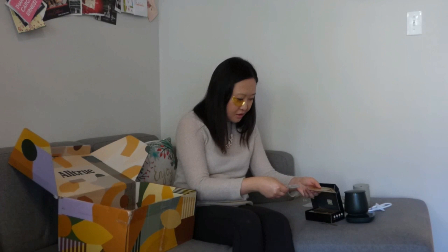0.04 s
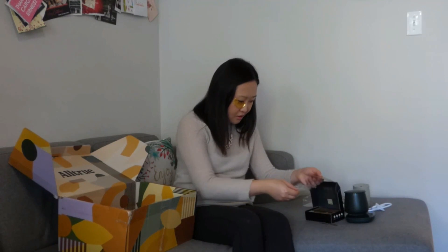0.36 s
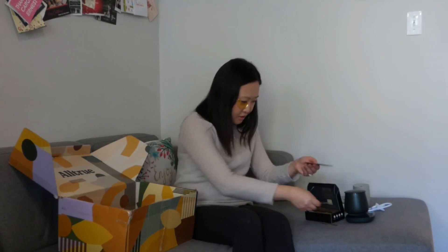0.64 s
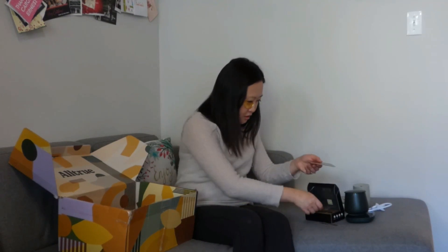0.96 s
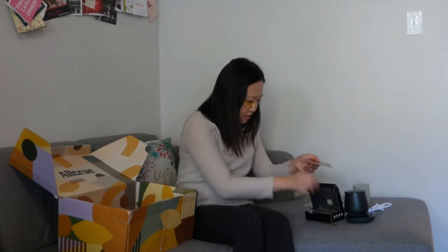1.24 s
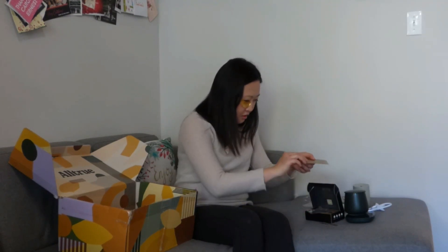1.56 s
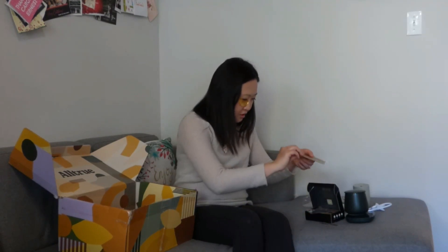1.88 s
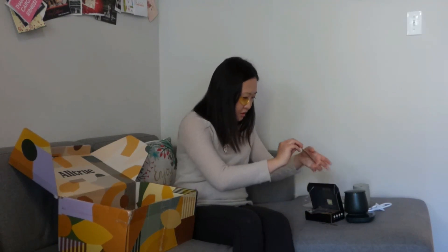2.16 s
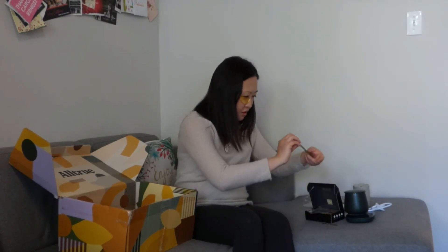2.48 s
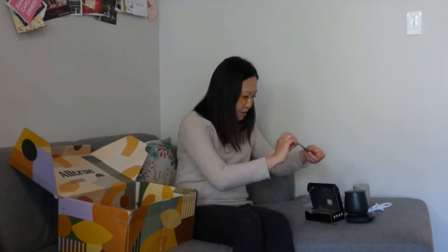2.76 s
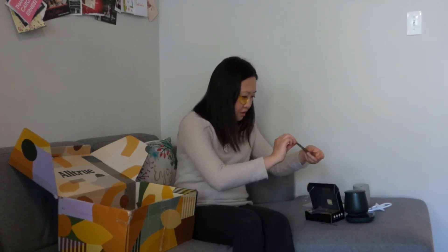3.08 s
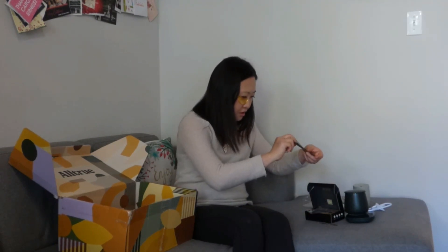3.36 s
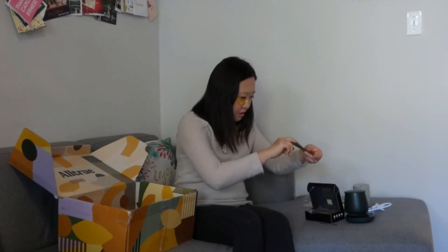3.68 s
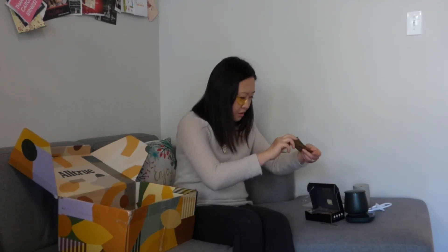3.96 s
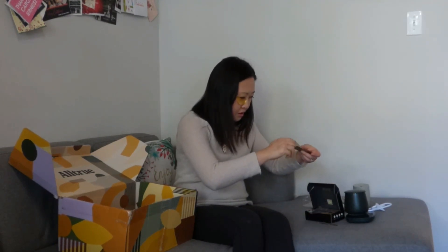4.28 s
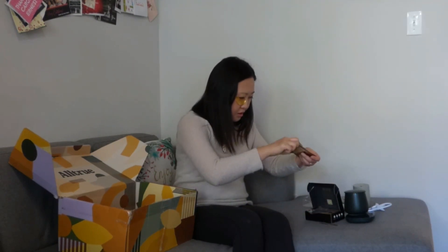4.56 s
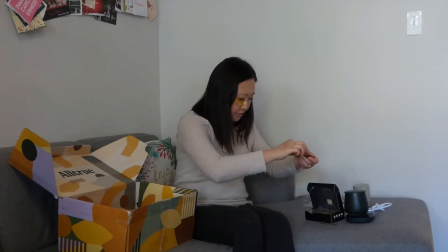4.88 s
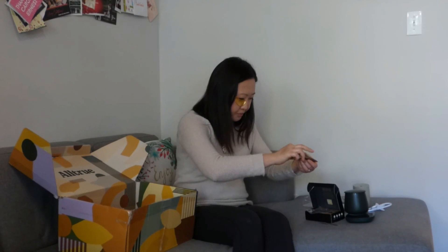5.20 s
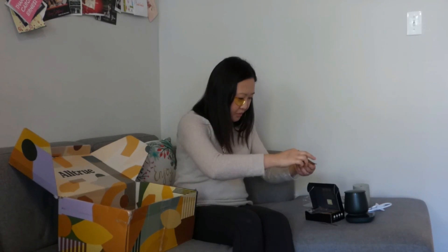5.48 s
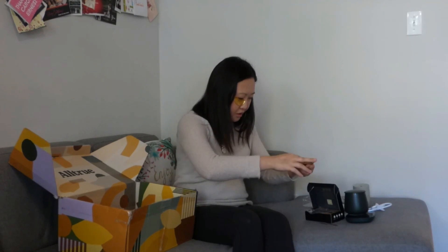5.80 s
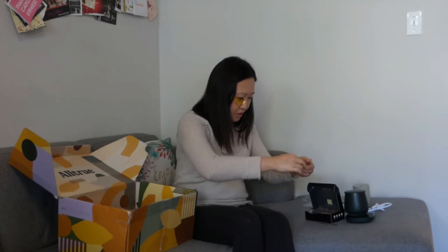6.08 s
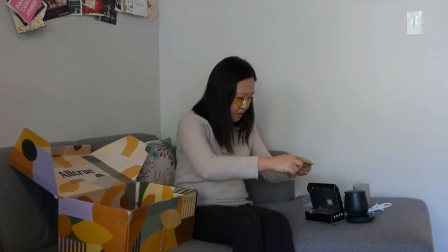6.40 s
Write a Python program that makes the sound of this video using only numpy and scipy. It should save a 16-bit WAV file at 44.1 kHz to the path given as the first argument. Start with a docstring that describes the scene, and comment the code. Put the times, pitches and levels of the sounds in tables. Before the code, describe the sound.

A faint, steady rumble and hiss of room air runs throughout. In the first second there are a few soft plastic ticks and brief rubs of card, with a tiny tap at about 0.5 seconds and a clearer light knock of an item against its box at 1.2. After a near-quiet moment, a stiff plastic wrapper starts crackling at about 2.3 seconds as fingers work at it. Another short cluster of crisp snaps comes around 3.4 to 3.8. From 4.3 the crinkling is busier, mixed with thin rustling, short card scrapes and a few very soft thumps as the hollow pack flexes. It grows louder around 5.7, and the sharpest crackles fall between 6.3 and 6.5 seconds. Everything is fairly quiet, straight ahead and about two metres away, with the short echo of a small bare-walled room.

```python
"""A stiff plastic wrapper crackles as someone unboxes a small item and works it open, two metres or so away.
Each crackle is a run of tiny buckling snaps in the film; between them fingers rub the wrapper and its card.
The item knocks against its box, and the hollow pack thumps softly as it flexes.
A small bare-walled room answers, over a faint steady bed of air rumble and hiss."""
import sys
import numpy as np
from scipy import signal
from scipy.fft import rfft, irfft, next_fast_len
from scipy.io import wavfile

SR = 44100
rng = np.random.default_rng(int(sys.argv[2]) if len(sys.argv) > 2 else 0)


def master_out(mix):
    """Clip the mix to full scale and print it as 16-bit PCM to the path in sys.argv[1]."""
    frames = np.transpose(np.atleast_2d(mix))
    ceiling = np.clip(frames, -1, 1)
    pcm = np.round(ceiling * 32767).astype(np.int16)
    wavfile.write(sys.argv[1], SR, pcm)


N = 288414

# How hard the fingers work the pack, and how much goes into the film: time_s, effort_db, film_offset_db
EFFORT = [(0, -69, -8.5), (2.25, -69, -2), (2.4, -56, -2), (2.75, -60.5, -1.5), (3.0, -70, -13),
          (3.46, -53, 3.5), (3.7, -64, 4), (4.15, -56, -11), (4.33, -45, -5), (4.68, -51.5, 2),
          (5.08, -69.5, -3), (5.26, -45.5, -3), (5.56, -53.5, 2.5), (5.75, -35.5, 2.5), (5.89, -50, -3),
          (6.18, -44.5, -9), (6.44, -38, -0.5), (6.54, -53, 2)]


def crackles(count=60, lead=.45, uneven_db=5.5, swell_db=9, break_db=11, overrun_s=.0015):
    """A fold gives way in an avalanche of fine snaps that grows until the crease itself flips."""
    body_trim_db, snap_db, sizzle_db, sizzle_per_body = -1.5, -.5, -3, -.18  # more body, less sizzle
    trigger_db, trigger_db_per_s = 22, -1700  # the slower the build-up, the weaker the snap that starts it
    size = 4096
    colours = registers(np.fft.rfftfreq(size, 1 / SR))
    out = np.zeros(N + 2 * size)
    for time_s, build_s, level_db, body_db in buckles():
        span_s = np.clip(build_s, .001, .025) + overrun_s
        progress = (np.arange(count) + rng.random(count)) / count * (1 + lead) - lead
        growth = progress + 3 * np.minimum(progress, 0)  # faint ticks run ahead of the build-up
        sizes = amp(swell_db * growth + uneven_db * np.clip(rng.standard_normal(count), -2, 2))
        sizes[count - count // 8] = amp(swell_db + break_db)  # the crease flips
        sizes[np.searchsorted(progress, 0)] = amp(trigger_db + trigger_db_per_s * build_s)
        avalanche = snaps((progress + lead) * span_s, sizes, size)
        bands = irfft(rfft(avalanche) * colours)
        bands *= np.sqrt(span_s * SR) / np.linalg.norm(bands, axis=1, keepdims=True)
        mix_db = np.array([body_trim_db + body_db, snap_db, sizzle_db + sizzle_per_body * body_db])
        start = round((time_s - build_s - lead * span_s) * SR)
        out[start:][:size] += amp(level_db + mix_db) @ bands
    return out[:N]


def buckles(rebound_s=.018, rebound_db=-12, strays_per_s=9, stray_db=1.5, spread_db=1.5):
    """Cue list: each clear buckle springs back once, softly; small strays follow the pull on the film."""
    # Clear buckles, large facets having more body: time_s, build_s, level_db, body_offset_db
    clear = [(0.471, 0.0071, -51.5, 2.5), (.957, 0.0028, -54.5, -20), (1.007, .01, -58, -1),
             (1.077, 0.0073, -54.5, -4), (1.213, .008, -43, -3.5), (1.585, 0.015, -69, -12),
             (1.741, 0.0065, -56, -4), (1.991, .019, -64, -4.5), (2.084, 0.018, -64, -22),
             (2.122, 0.014, -64, -1.5), (2.349, 0.011, -41, -11.5), (2.385, 0.013, -39, -12.5),
             (2.469, 0.011, -49.5, -6.5), (2.525, 0.0082, -48.5, -28), (2.666, 0.0087, -45.5, -3.5),
             (2.722, 0.016, -52, -7), (2.847, 0.0062, -52.5, -20), (3.122, 0.0072, -49.5, -12),
             (3.25, 0.021, -59.5, 3.5), (3.328, 0.0085, -51.5, -3), (3.399, 0.0071, -36.5, -9.5),
             (3.423, 0.011, -41.5, -7.5), (3.497, .018, -44, -4), (3.621, 0.0085, -47, -3.5),
             (3.725, 0.017, -59, -24), (3.767, 0.0068, -41, -8.5), (3.982, .015, -60, 4.5),
             (4.09, 0.0032, -56, 5.5), (4.251, 0.019, -57.5, -2), (4.308, 0.0069, -43, -3),
             (4.332, 0.0025, -37, -26), (4.339, 0.0056, -37, -23), (4.457, 0.0054, -40.5, -9),
             (4.557, 0.0062, -34.5, -4), (4.633, 0.026, -39.5, -2), (4.779, 0.005, -44.5, -15),
             (4.797, 0.0083, -48, -57), (4.908, 0.0053, -48, -3), (4.979, 0.0057, -49, -8),
             (5.091, 0.0012, -43.5, -7), (5.099, 0.0069, -38.5, -5.5), (5.217, .011, -37.5, -9.5),
             (5.239, 0.0082, -44, -5.5), (5.303, 0.0098, -44, -3), (5.37, 0.0074, -42, -5.5),
             (5.443, 0.0012, -33, -16), (5.449, 0.0033, -34.5, -7), (5.6, 0.015, -44.5, -3.5),
             (5.62, .015, -44, -10.5), (5.679, .012, -33.5, -7.5), (5.695, 0.0081, -30, -12),
             (5.712, 0.011, -36, -4.5), (5.793, 0.0066, -29, -12), (5.807, .008, -39.5, 1),
             (5.852, 0.011, -32, -4.5), (5.98, 0.018, -50, 7), (6.046, 0.0088, -43, -20),
             (6.12, 0.018, -50.5, 6.5), (6.193, 0.0083, -40.5, -2.5), (6.263, 0.015, -34, -4.5),
             (6.302, 0.0016, -22.5, -7), (6.308, 0.0037, -28, -2.5), (6.422, 0.0041, -32, -6),
             (6.473, 0.0087, -29, -12.5)]
    rebound_build_s, stray_build_s, stray_body_db = .006, .005, -14
    delays = rebound_s * np.exp(.3 * rng.standard_normal(len(clear)))
    rebounds = [(time_s + delay, rebound_build_s, db + rebound_db, body_db)
                for (time_s, _, db, body_db), delay in zip(clear, delays)]
    slots = np.arange(.1, N / SR - .1, 1 / strays_per_s)
    jitter, accent = rng.standard_normal((len(slots), 2)).T
    times = np.clip(slots + jitter / strays_per_s / 2, .1, (N - 1) / SR)
    effort_db, film_offset_db = curves(EFFORT)
    pull_db = sliding(effort_db) + film_offset_db
    levels = pull_db[(times * SR).astype(int)] + stray_db + spread_db * accent
    strays = [(time_s, stray_build_s, db, stray_body_db) for time_s, db in zip(times, levels)]
    return clear + rebounds + strays


def snaps(times, sizes, length, pitch_hz=4500, decay_cycles=.43):
    """Each facet that flips gives a damped swing of about one cycle at a pitch of its own."""
    t = np.arange(SR // 400) / SR
    detune, polarity = rng.standard_normal((len(times), 2)).T
    hz = np.clip(pitch_hz * np.exp(detune[:, None]), SR / 60, SR / 3)
    swing = np.cos(2 * np.pi * hz * t) * np.exp(-t * hz / decay_cycles)
    swing *= (np.sign(polarity) * sizes / np.linalg.norm(swing, axis=1))[:, None]
    at = (np.maximum(times, 0) * SR).astype(int)[:, None] + np.arange(len(t))
    return np.bincount(at.ravel(), swing.ravel(), length)[:length]


def registers(hz, body_hz=2500, sizzle_hz=7500):
    """Responses of the wrapper's body, snap and sizzle: large, middling and tiny facets."""
    # Tone colour of one snap in the film: frequency_hz, gain_db
    film_colour = [(60, -21), (150, -39), (290, -1), (390, -15.5), (500, 0.5), (700, -4.5), (1200, -1.5),
                   (2100, -2.5), (3000, -4), (4800, 2.5), (7500, 5), (10000, 4), (13000, -1.5),
                   (15500, -13)]
    body = 1 / (1 + (hz / body_hz) ** 10)
    sizzle = 1 - 1 / (1 + (hz / sizzle_hz) ** 10)
    gain = amp(along(film_colour, hz))
    return np.array([causal(gain * np.sqrt(np.abs(share))) for share in (body, 1 - body - sizzle, sizzle)])


def rustle(rub_db=-9, film_db=-6, sizzle_db=-2):
    """Fingers drag over the pack: a dull rub and the fine crinkle of the film."""
    effort_db, film_offset_db = curves(EFFORT)
    bright_mix = np.array([0, 1, amp(sizzle_db)])
    rub = filtered(grains(per_s=2500, uneven_db=3.5), lambda hz: registers(hz)[0])
    film = filtered(grains(per_s=1200, uneven_db=5.5), lambda hz: causal(bright_mix @ abs(registers(hz))))
    return amp(sliding(effort_db)) * (amp(rub_db) * unit(rub) + amp(film_db + film_offset_db) * unit(film))


def sliding(effort_db, stick_db=-69.5):
    """The part of the effort that moves the pack, in dB; under stick_db the fingers stick."""
    return effort_db - 10 * np.log10(1 + amp(stick_db - effort_db) ** 4)


def grains(per_s, uneven_db):
    """Friction as a steady patter of tiny slips."""
    count = int(per_s * N / SR)
    times = rng.random(count) * N / SR
    sizes = amp(uneven_db * np.clip(rng.standard_normal(count), -2, 2))
    return snaps(times, sizes, N)


def scrapes(trim_db=-3, rise_s=.011, relative_width=.96):
    """Short strokes of friction, each ringing the patch of card that it touches."""
    # Fingers, item and box rub on each other: start_s, fade_s, level_db, resonance_hz
    strokes = [(0.073, 0.016, -62, 405), (0.3, 0.14, -65, 1630), (0.515, 0.033, -50.5, 820),
               (0.947, 0.024, -53, 1060), (1.061, 0.068, -57.5, 920), (1.114, 0.065, -48.5, 980),
               (1.564, .03, -64, 2350), (1.972, 0.049, -60.5, 1930), (2.302, 0.065, -58, 1800),
               (2.503, .025, -45.5, 990), (2.832, 0.027, -51.5, 1110), (3.928, 0.011, -47.5, 2100),
               (3.96, 0.023, -58, 2000), (4.541, 0.049, -37, 1820), (4.774, 0.053, -41.5, 815),
               (5.281, 0.029, -38.5, 1700), (5.955, 0.1, -40.5, 1880), (6.317, 0.036, -36, 1210)]
    size = SR // 5
    t = np.arange(size) / SR
    slips = grains(per_s=4000, uneven_db=5)
    out = np.zeros(N)
    for start_s, fade_s, level_db, centre_hz in strokes:
        envelope = np.interp(t, [0, rise_s, rise_s + fade_s], [0, 1, 0])
        card_mode = [(centre_hz, relative_width * centre_hz, 0)]
        at = round(start_s * SR)
        rasp = filtered(slips[at:at + size], lambda hz: resonances(card_mode, hz) ** 2)
        out[at:at + size] += amp(level_db + trim_db) * envelope * unit(rasp)
    return out


def knocks(trim_db=-4, vary_db=2):
    """Each contact rings the box briefly, its modes at new strengths."""
    # The item hits its box: start_s, level_db
    hits = [(.468, -51), (1.208, -41.5), (1.222, -72)]
    # Modes of the box: pitch_hz, level_db, t60_s
    box_modes = [(450, -8.5, 0.14), (660, -4, 0.24), (913, -1, 0.068), (1353, -4, 0.2)]
    t = np.arange(SR // 4) / SR
    out = np.zeros(N)
    for start_s, level_db in hits:
        ring = np.zeros(len(t))
        for pitch_hz, mode_db, t60_s in box_modes:
            envelope = amp(mode_db + vary_db * rng.standard_normal() - 60 * t / t60_s)
            ring += envelope * np.sin(2 * np.pi * pitch_hz * t)
        out[round(start_s * SR):][:len(t)] += amp(level_db + trim_db) * ring
    return out


def thumps(push_s=.0024):
    """The flexing pack shoves a little air: one low swing, no ring."""
    # Soft pushes of the pack: start_s, level_db
    pushes = [(1.21, -54), (2.378, -61), (3.396, -51), (4.336, -49), (4.449, -53), (5.094, -53),
              (5.446, -50), (6.045, -56), (6.307, -44)]
    age = np.arange(SR // 10) / SR / push_s
    swing = 2 * age * (2 - age) * np.exp(-age)
    out = np.zeros(N)
    for start_s, level_db in pushes:
        out[round(start_s * SR):][:len(swing)] += amp(level_db) * swing
    return out


def hollow_pack(x):
    """The pack in the hands adds its hollow ring."""
    # Resonances of the pack: centre_hz, width_hz, gain_db
    pack_modes = [(985, 156, -7.5), (1717, 8.3, 4.5), (1940, 150, -12), (4010, 89, -3), (4930, 500, -7.5)]
    return filtered(x, lambda hz: 1 + resonances(pack_modes, hz))


def near_walls(x, walls_db, width, count=16):
    """The straight path and first echoes from the corner behind the hands, unequal left and right."""
    paths = np.zeros((2, SR // 30))
    delays_s = np.linspace(.003, .028, count) + rng.uniform(-.001, .001, count)
    mid, side = rng.choice([-1, 1], (2, count))
    echoes = (mid + width * np.outer([1, -1], side)) * np.linspace(1, .5, count)
    paths[:, (delays_s * SR).astype(int)] = echoes
    paths *= amp(walls_db) / np.linalg.norm(paths, axis=1, keepdims=True)
    paths[:, 0] = 1  # straight path
    return signal.fftconvolve(x[None], paths, axes=1)[:, :N]


def room(x, early_db=3, early_s=.0021, first_wall_s=.0013, low_cut_hz=190):
    """Every snap radiates its own way, so the walls return a diffuse, dying wash."""
    # Reverb time of the bare room: frequency_hz, t60_s
    reverb_times = [(200, 0.28), (1400, 0.45), (4000, 0.55), (9700, 0.3), (15000, 0.28)]
    # Left-right likeness of the wash: frequency_hz, correlation
    likeness = [(200, .65), (1000, .62), (4000, .68), (8000, .72), (13000, .72)]
    frames = dict(fs=SR, nperseg=256, noverlap=192)
    hz, t, spectrum = signal.stft(x, **frames)
    age = t[t < .5]
    decay = amp(-60 * age / along(reverb_times, hz)[:, None])
    decay *= amp(early_db * np.exp(-age / early_s)) * np.clip(age / first_wall_s, 0, 1)
    tail = decay ** 2 / np.sum(decay ** 2, 1, keepdims=True)
    energy = signal.fftconvolve(np.abs(spectrum) ** 2, tail, axes=1)[:, :len(t)]
    noise = signal.stft(stereo_noise(likeness), **frames)[2]
    envelope = np.sqrt(np.abs(energy) / np.mean(np.abs(noise) ** 2))
    wash = signal.istft(noise * envelope, **frames)[1][:, :N]
    return filtered(wash, lambda hz: 1 - 1 / (1 + (hz / low_cut_hz) ** 6))  # the wash has no deep bass


def air(level_db=-68):
    """Room tone: a faint rumble under an even hiss."""
    # Tone colour of the still air: frequency_hz, gain_db
    colour = [(20, -13.5), (35, -5.5), (70, -15), (140, -15.5), (200, -9.5), (300, -11.5), (450, -15.5),
              (900, -16.5), (1500, -28), (3000, -30), (8000, -27.5), (15500, -32)]
    # Left-right likeness of the air: frequency_hz, correlation
    likeness = [(100, .75), (1000, .7), (8000, .8)]
    return amp(level_db) * unit(filtered(stereo_noise(likeness), lambda hz: amp(along(colour, hz))))


def stereo_noise(likeness):
    """White noise with this left-right likeness by frequency."""
    turn = lambda hz: np.arccos(np.clip(along(likeness, hz), 0, 1)) / 2
    pair = rng.standard_normal((2, N))
    mid, side = filtered(pair, lambda hz: np.array([np.cos(turn(hz)), np.sin(turn(hz))]))
    return np.array([mid + side, mid - side])


def amp(db):
    """Decibels to gain."""
    return 10 ** (np.asarray(db) / 20)


def unit(x):
    """Scaled to rms 1."""
    return x / np.sqrt(np.mean(x ** 2) + 1e-20)


def along(points, hz):
    """(frequency_hz, value) points read on a log axis."""
    points_hz, values = np.transpose(points)
    return np.interp(np.log(hz + 1), np.log(points_hz + 1), values)


def curves(rows):
    """One value per sample for each column after the time."""
    times, *columns = np.transpose(rows)
    return [np.interp(np.arange(N) / SR, times, column) for column in columns]


def filtered(x, response):
    """x through a complex frequency response."""
    n = x.shape[-1]
    padded = 2 * next_fast_len(n // 2 + SR // 20)
    return irfft(rfft(x, padded) * response(np.fft.rfftfreq(padded, 1 / SR)), padded)[..., :n]


def causal(gain):
    """The minimum-phase response with this gain: it rings only after the blow."""
    cepstrum = irfft(np.log(np.maximum(gain, 1e-6)))
    half = len(cepstrum) // 2
    cepstrum[1:half] *= 2
    cepstrum[half + 1:] = 0
    return np.exp(rfft(cepstrum))


def resonances(modes, hz):
    """Summed response of (centre_hz, width_hz, gain_db) modes."""
    return sum(amp(db) * 1j * hz * width / (centre ** 2 - hz ** 2 + 1j * hz * width)
               for centre, width, db in modes)


def scene(film_near_db=-2, card_near_db=-4, room_db=-1):
    """The hands are almost straight ahead; card and box radiate more to the sides than the film does."""
    # Stereo balance, left then right: gain_db
    balance_db = [
        [0],
        [.4],
    ]
    film = crackles() + rustle()
    card = scrapes() + knocks()
    wash = amp(room_db) * room(film + card)
    near = amp(film_near_db) * near_walls(film + thumps(), walls_db=-3, width=.5)
    near += amp(card_near_db) * near_walls(card, walls_db=-.5, width=.63)
    return hollow_pack(near + wash) * amp(balance_db) + air()


def record(dry, top_hz=15900, dc_offset=-.0029):
    """A brick-wall high cut and a slight offset from zero."""
    return filtered(dry, lambda hz: hz < top_hz) + dc_offset


dry = scene()
out = record(dry)
master_out(out)
```